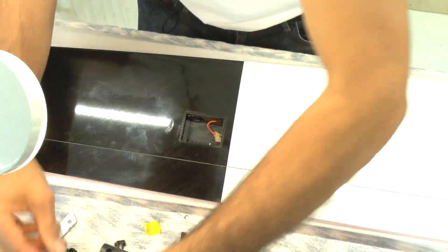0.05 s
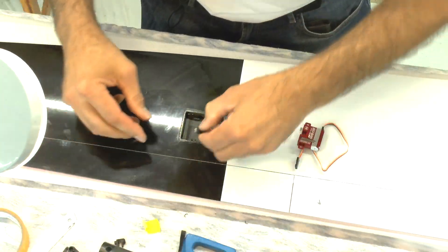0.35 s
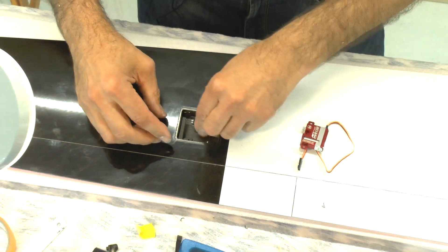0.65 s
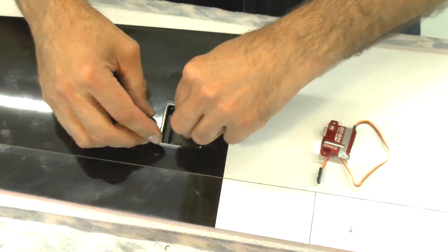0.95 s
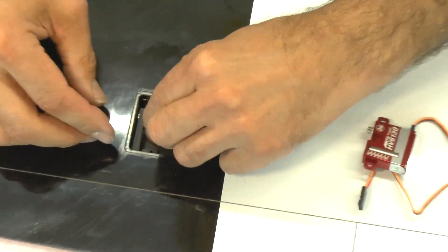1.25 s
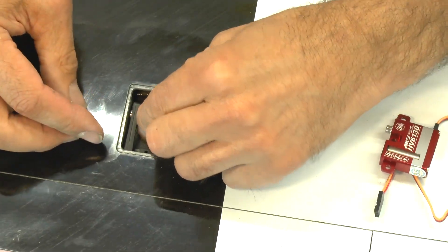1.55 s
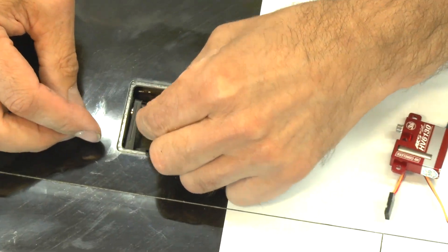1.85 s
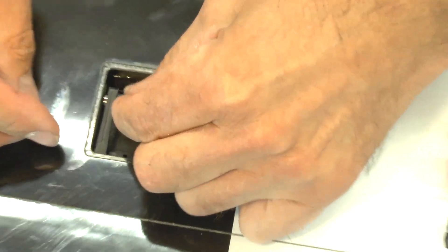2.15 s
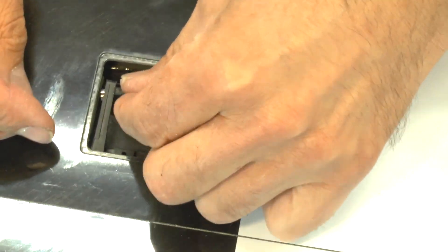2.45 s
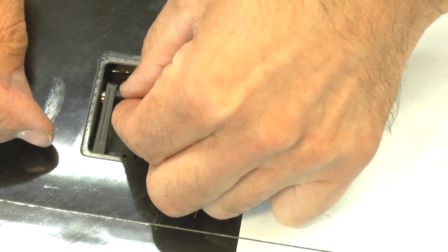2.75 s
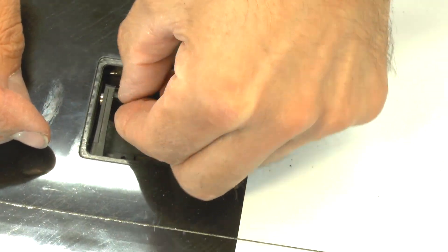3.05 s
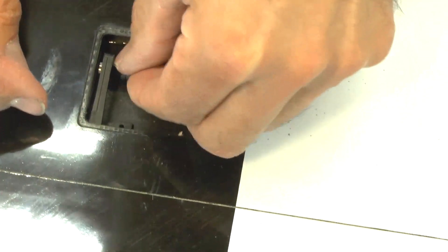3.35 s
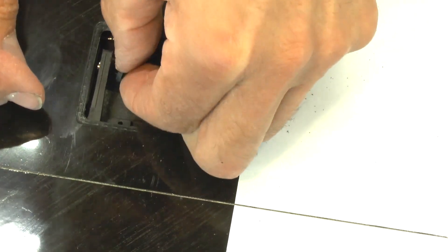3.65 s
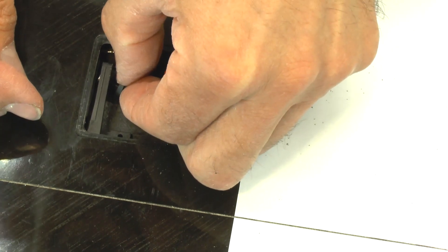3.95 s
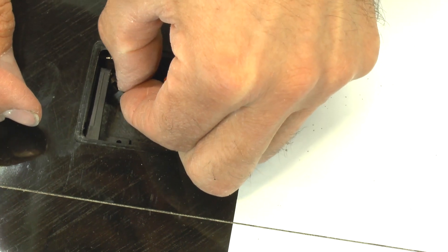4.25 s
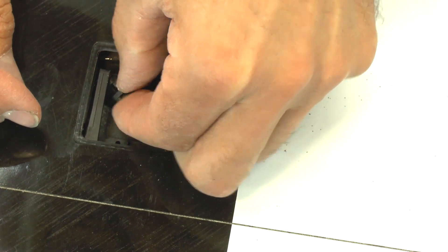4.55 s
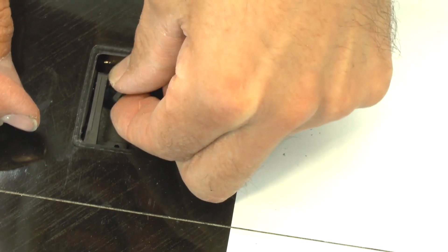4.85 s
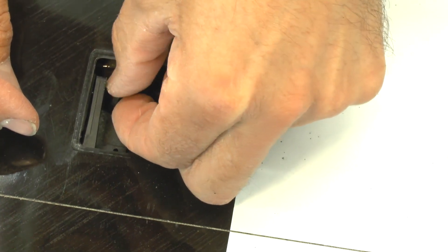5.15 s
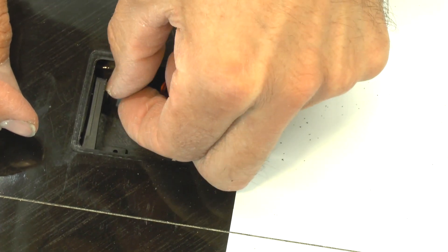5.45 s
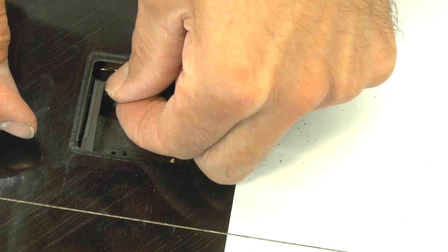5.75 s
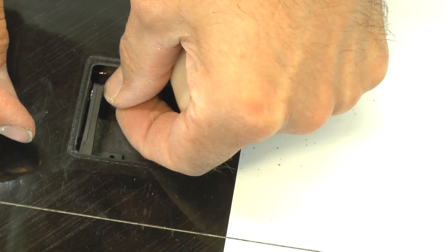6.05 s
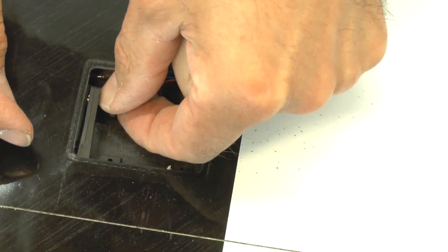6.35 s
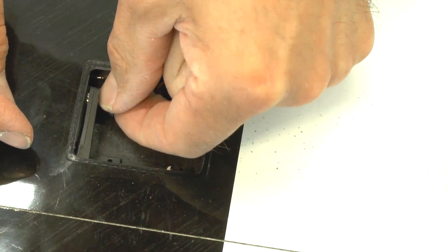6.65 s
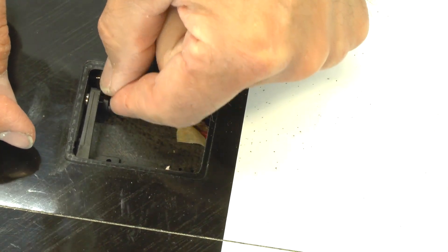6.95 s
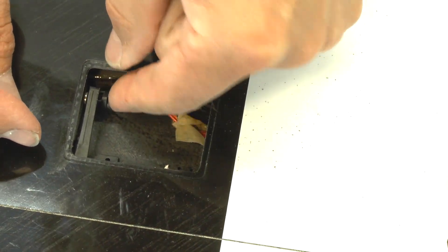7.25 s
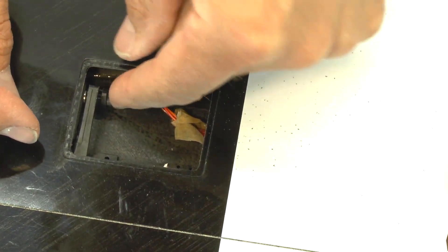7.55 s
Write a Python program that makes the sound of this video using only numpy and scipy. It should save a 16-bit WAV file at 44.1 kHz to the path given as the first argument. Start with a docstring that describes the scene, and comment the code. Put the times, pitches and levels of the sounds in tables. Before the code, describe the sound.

Small metal and plastic parts scrape, click and knock inside a hollow model wing as fingers press them in, ending with a sharp snap.

```python
"""A quiet workshop, a stereo microphone close to the servo bay of a hollow composite model wing.
Over faint hiss and a swelling rumble, fingers rub along the skin. From about 0.8 s small metal and
plastic parts scrape in short strokes and knock into place, setting the shell ringing. Near 3.5 s come
the first dry ticks and a fingertip's thump. At 5.3 s something squeaks further off in the room;
then the close work goes on, ending on a sharp snap."""
import sys
import numpy as np
from scipy import signal
from scipy.fft import rfft, irfft, next_fast_len
from scipy.io import wavfile
from scipy.ndimage import uniform_filter1d

SR = 44100
rng = np.random.default_rng(int(sys.argv[2]) if len(sys.argv) > 2 else 0)


def output_pcm(signal):
    """Save a mono or channel-first signal as 16-bit PCM at the path in sys.argv[1].

    Samples are clipped to [-1, 1] before scaling.
    """
    pcm = np.clip(np.atleast_2d(signal).T, -1, 1) * 32767
    wavfile.write(sys.argv[1], SR, np.round(pcm).astype(np.int16))


N = 343539
RING_SAMPLES = 8192
RING_HZ = np.fft.rfftfreq(RING_SAMPLES, 1 / SR)
SIDES = np.array([[.5], [-.5]])   # splits a left-minus-right value between the channels
BLOW_GAIN_DB = 25   # for knocks and thumps


def from_db(db):
    """Decibels to gain."""
    return 10 ** (np.asarray(db) / 20)


def unit_energy(x):
    """Scale each row so that its squares sum to one."""
    return x / np.sqrt(np.sum(x ** 2, axis=-1, keepdims=True) + 1e-20)


def at_hz(points, hz):
    """Read rows of frequency and value on a log-frequency axis."""
    known_hz, values = np.transpose(points)
    return np.interp(np.log(np.maximum(hz, 1)), np.log(known_hz), values)


def coloured(x, spectrum):
    """Shape noise by rows of frequency in Hz and gain in dB."""
    size = x.shape[-1]
    gain = from_db(at_hz(spectrum, np.fft.rfftfreq(size, 1 / SR)))
    return irfft(rfft(x) * gain, size)


def minimum_phase(gain):
    """The spectrum of the quickest ring that has this gain at each frequency."""
    cepstrum = irfft(np.log(gain + 1e-12))
    cepstrum[1:RING_SAMPLES // 2] *= 2
    cepstrum[RING_SAMPLES // 2 + 1:] = 0
    return np.exp(rfft(cepstrum))


# The workshop at rest. Each row: frequency in Hz, relative level in dB.
ROOM_TONE = [(8.8, -13), (15, 8), (32, 0.5), (150, -12), (364, -16), (444, -17), (642, -19), (854, -20.5),
             (1170, -21.5), (1600, -23), (1890, -24.5), (3070, -27), (3440, -27), (4580, -28), (13500, -29)]
# Its stereo width. Each row: frequency in Hz, side level against mid in dB.
ROOM_TONE_WIDTH = [(25, 3), (45, -3), (70, -2.5), (120, -1), (200, 1.5), (300, 1), (700, -1), (1300, -3),
                   (4400, -2), (8000, -.5), (13000, 0)]


def room_tone(level_db=-56.5, top_hz=13900):
    """Steady noise all around the microphone, heaviest in the bass, under an even hiss."""
    mid, side = coloured(rng.standard_normal((2, next_fast_len(N))), ROOM_TONE)
    stereo = (mid + coloured(side, ROOM_TONE_WIDTH) * [[1], [-1]]) / mid.std()
    lowpass = signal.ellip(10, .1, 70, top_hz, fs=SR, output="sos")
    return from_db(level_db) * signal.sosfilt(lowpass, stereo)[:, :N]


# Swells of bass at the microphone. Each row: time in seconds, deep layer in dB, low layer in dB.
RUMBLE_SWELLS = [(0, -57, -72), (1.45, -60, -70), (1.6, -58, -60), (2.05, -40, -54), (2.15, -44, -56),
                 (2.24, -31, -53), (2.36, -45, -61), (2.55, -45, -63), (2.75, -55, -66), (3.4, -59, -63),
                 (3.8, -68, -76), (4.8, -70, -72), (5.0, -58, -60), (5.7, -58, -54.5), (6.2, -62, -64),
                 (6.62, -55, -66), (6.77, -43, -53), (7.2, -55, -66), (7.79, -54, -66)]
# The colour of each layer. Each row: frequency in Hz, relative level in dB.
DEEP_SPECTRUM = [(8, -14), (16, 2), (30, -3), (55, -15), (100, -30), (300, -54)]
LOW_SPECTRUM = [(20, -8), (60, 2), (120, -4), (200, -2.5), (350, -9), (600, -17), (1500, -40)]


def rumble():
    """Two swelling layers of bass noise, with opposite sign left and right."""
    times, *levels_db = np.transpose(RUMBLE_SWELLS)
    out = np.zeros(N)
    for spectrum, level_db in zip((DEEP_SPECTRUM, LOW_SPECTRUM), levels_db):
        noise = coloured(rng.standard_normal(next_fast_len(N)), spectrum)[:N]
        swell = from_db(np.interp(np.arange(N) / SR, times, level_db))
        out += noise / noise.std() * swell
    return signal.sosfilt(signal.butter(2, 1500, fs=SR, output="sos"), out) * [[1], [-1]]


# Resonances of the shell and its parts. Each row: frequency in Hz, width in Hz, relative level in dB.
WING_MODES = [(372, 117, -11), (537, 114, -11), (598, 120, -6.5), (1044, 310, -2), (1090, 150, -11.5),
              (1288, 110, -7), (1544, 120, -6.5), (1730, 205, -2), (1915, 88, -6.5), (2193, 110, -7),
              (2480, 350, -7), (3130, 280, -12), (3900, 630, -7), (4550, 270, -10), (5230, 890, -4.5),
              (6720, 1540, 0.5), (7180, 270, -7), (7670, 910, -3.5), (11300, 1200, -11)]
# Where the ring sits at the microphone. Each row: frequency in Hz, left over right in dB.
WING_BALANCE = [(200, 2), (400, 4.5), (680, 4.5), (1200, -0.5), (1850, 2), (2500, -6), (4400, -2),
                (7200, -1), (9000, 5.5)]
# How it reaches the two sides. Each row: frequency in Hz, phase lead of the left in radians.
WING_PHASE_LEAD = [(600, 0.64), (1300, -1), (1800, -0.7), (2200, -1.47), (3600, -1.1), (6700, -0.04),
                   (8200, 0.87), (10000, -2)]


def wing_ring(contact_db, spread_s, skirt=1.094):
    """The hollow wing ringing close up; each point of contact colours it differently."""
    hz, width, db = np.transpose(WING_MODES)[:, :, None]
    off_centre = (RING_HZ ** 2 - hz ** 2) / ((RING_HZ + 1) * width)
    peaks = from_db(db) * unit_energy((1 + off_centre ** 2) ** (-skirt / 2))
    gain = np.sqrt(np.sum(peaks ** 2, axis=0) * len(RING_HZ)) * from_db(contact_db)
    # bending waves disperse: each frequency reaches the air after its own short delay
    delays = spread_s * rng.uniform(0, 2.4, size=48)
    delay = np.interp(RING_HZ, np.linspace(0, SR / 2, len(delays)), delays)
    phase = SIDES * at_hz(WING_PHASE_LEAD, RING_HZ) - 2 * np.pi * np.cumsum(delay) * RING_HZ[1]
    balance = from_db(SIDES * at_hz(WING_BALANCE, RING_HZ))
    ring = irfft(minimum_phase(gain) * balance * np.exp(1j * phase))
    return ring[:, :RING_SAMPLES // 2]


def friction(strokes, catches_per_s=5000, spread_db=2.5, falter_db=1.5, gain_db=-0.5):
    """Tiny catches of the surface drive the wing while the pressure rises, falters and falls."""
    out, t = np.zeros((2, N)), np.arange(N) / SR
    catches = (rng.random(N) < catches_per_s / SR) * rng.choice([-1, 1], N)
    falter = uniform_filter1d(rng.standard_normal(N), size=300)
    strength_db = spread_db * np.minimum(rng.exponential(1, N), 3)
    catches = catches * from_db(strength_db + falter_db * falter / falter.std())
    catches /= catches.std()
    for peak, rise, fall, contact_db in strokes:
        start, end = peak - max(rise, .004), peak + max(fall, .004)
        span = slice(max(int(start * SR), 0), int(end * SR))
        pressure = np.interp(t[span], [start, peak, end], [0, 1, 0]) ** 0.98
        ring = wing_ring(contact_db, spread_s=0.000525)
        add(out, start, signal.fftconvolve(ring, (catches[span] * pressure)[None], axes=1))
    return from_db(gain_db) * out


def add(track, s, sound):
    """Mix a sound into a stereo track at s seconds."""
    start = max(int(s * SR), 0)
    part = sound[..., :max(N - start, 0)]
    track[:, start:start + part.shape[-1]] += part


# Fingers on the skin, close by. Each row: peak time, rise and fall in seconds, relative level in dB.
RUB_STROKES = [(0.09, 0.035, 0.013, -63.5), (0.37, 0.086, .046, -65.5), (0.68, 0.17, 0.11, -63),
               (1.28, 0.11, 0.23, -64), (1.63, 0.13, 0.042, -65.5), (2.4, 0.12, 0.082, -69),
               (4.64, 0.33, 0.2, -65.5), (5.75, 0.17, .11, -68.5)]
# The force of a rub. Each row: frequency in Hz, relative level in dB.
RUB_SPECTRUM = [(300, -1.5), (900, -1.5), (1400, -1.5), (1850, -0.5), (2900, -3.5), (5200, -2),
                (6400, -1.5), (7700, -1), (10000, -1.5), (15000, -17)]


def rubs(shift_count=30, shift_s=0.053, shift_db=-69.5, spread_db=7):
    """Fingers rub along the skin, and the tips shift lightly at random moments."""
    shifts = [(when * N / SR, shift_s * lean, shift_s * (1 - lean), shift_db + spread_db * (2 * push - 1))
              for when, lean, push in rng.random((shift_count, 3))]
    colour_db = at_hz(RUB_SPECTRUM, RING_HZ)
    return friction([(s, rise, fall, db + colour_db) for s, rise, fall, db in RUB_STROKES + shifts])


def contact(force, brightness, spot_hz, spot_db, spot_octaves=0.68):
    """Colour of a contact in dB: harder surfaces tilt it to the treble; each spot favours one pitch."""
    tilt = brightness * np.log2(np.clip(RING_HZ, 480, 7200) / 1800)
    octaves_off = np.log2((RING_HZ + 1) / spot_hz)
    boost = spot_db * np.exp(-.5 * (octaves_off / spot_octaves) ** 2)
    return at_hz(force, RING_HZ) + tilt + boost


# Parts sliding just in front of the microphone. Each row: peak time, rise and fall in seconds,
# relative level in dB, brightness in dB per octave, pitch the spot favours in Hz.
SCRAPE_STROKES = [(0.835, .059, 0.028, -60, 0.5, 1000), (1.07, 0.027, 0.059, -68, 2, 900),
                  (1.19, 0.077, 0.016, -67, 1.5, 1000), (1.745, 0.03, 0.072, -57, -1, 2200),
                  (1.822, 0.022, 0.013, -61.5, -4.5, 800), (2.065, 0.027, 0.028, -51.5, 1, 7000),
                  (2.102, .021, 0.024, -55, -2, 2200), (2.163, 0.0088, 0.0083, -61.5, 1, 7000),
                  (2.224, 0.03, 0.013, -48, 4, 7600), (2.233, 0.013, 0.033, -47, -0.5, 3120),
                  (2.37, 0.081, 0.17, -64, 0, 2190), (2.745, 0.011, .014, -52.5, 1, 1000),
                  (3.265, 0.032, 0.025, -57, -0.5, 2210), (3.322, .022, .016, -60, -1, 2000),
                  (3.42, 0.045, 0.03, -57.5, 0, 1810), (3.478, 0.03, 0.026, -63.5, -2.5, 990),
                  (3.765, 0.066, 0.028, -57.5, -2, 1700), (3.955, .11, 0.064, -61.5, 0.5, 2200),
                  (4.015, .05, .032, -55, 1, 2400), (4.11, 0.025, 0.027, -66, 0, 2000),
                  (4.35, 0.065, 0.12, -62.5, -1, 1500), (4.963, 0.024, 0.017, -53, -1.5, 2500),
                  (5.01, 0.033, 0.073, -66.5, -2.5, 900), (5.454, 0.015, 0.016, -46, 0, 830),
                  (5.71, 0.066, 0.03, -64, -2, 800), (6.416, 0.041, 0.091, -55, -1.5, 1090),
                  (6.542, 0.069, 0.016, -52, -0.5, 1985), (7.443, 0.015, 0.059, -64, -0.5, 1000),
                  (7.52, 0.12, 0.061, -63.5, 3.5, 980)]
# The force of a scrape. Each row: frequency in Hz, relative level in dB.
SCRAPE_SPECTRUM = [(300, 0.5), (950, 1.5), (1500, -2), (2400, 1), (3100, -5.5), (4500, -7.5), (7300, -5),
                   (12000, -11), (15000, -21)]


def scrapes():
    """Metal and plastic parts drag over the shell in short strokes."""
    return friction([(s, rise, fall, db + contact(SCRAPE_SPECTRUM, brightness, spot_hz, spot_db=5))
                     for s, rise, fall, db, brightness, spot_hz in SCRAPE_STROKES])


# Parts striking the bay, close up. Each row: time in seconds, relative level in dB, brightness in dB
# per octave, pitch the spot favours in Hz, looseness of the part (1 is usual).
BAY_KNOCKS = [(0.853, -38.5, 4, 780, 0.83), (1.1761, -61.5, -1.5, 1740, 1.1), (1.732, -71, -5, 1500, 3),
              (1.992, -59, -4.5, 7200, 1), (2.071, -59, -4, 1870, 2), (2.091, -49, -2, 2600, 1.1),
              (2.131, -60, -2, 700, 2.3), (2.7232, -52, 1.5, 1180, 1.8), (2.7553, -41, .3, 2210, 1.04),
              (3.314, -60, -4.5, 1420, 1.5), (3.5621, -39.5, -3.5, 1370, 1.87), (4.483, -64.5, -3, 1200, 2),
              (4.7286, -45, -3.5, 2150, 1.04), (4.899, -54, -4.5, 1980, 1.3), (4.9717, -56.5, -6, 1310, 2),
              (6.4092, -59.5, -3, 1830, 1.3), (6.5719, -62.5, -7, 990, 3.1), (6.7201, -63, -7, 397, 1.1),
              (6.7499, -63, -1.5, 600, 1.3), (6.755, -56.5, -1, 700, 0.82), (6.7598, -53, -2, 1000, 1),
              (7.408, -68, 0, 900, 2.4), (7.427, -54, 0, 1050, 3.4), (7.5144, -59.5, -4.5, 1400, 3.4),
              (7.7614, -34.5, -0.3, 950, 0.53)]
# The force of a knock. Each row: frequency in Hz, relative level in dB.
KNOCK_SPECTRUM = [(200, -0.5), (500, 1), (1100, -2.5), (2000, -1), (4000, -0.5), (7500, -0.5),
                  (13000, -14.5)]


def knocks(slip_s=.01, slip_rise_s=0.0012, chatter_s=0.0024):
    """The part slips for an instant, strikes home, and chatters briefly as it seats."""
    out, t = np.zeros((2, N)), np.arange(RING_SAMPLES) / SR - slip_s
    slip = 0.57 * unit_energy((t < 0) * np.exp(-np.abs(t) / slip_rise_s))
    chatter = 0.37 * unit_energy((t > 0) * np.exp(-np.abs(t) / chatter_s))
    for s, db, brightness, spot_hz, looseness in BAY_KNOCKS:
        force = looseness * (slip + chatter) * rng.standard_normal(len(t))
        force[int(slip_s * SR)] += 1   # the strike itself
        contact_db = db + contact(KNOCK_SPECTRUM, brightness, spot_hz, spot_db=10.5)
        ring = wing_ring(contact_db, spread_s=0.000729)
        add(out, s - slip_s, signal.fftconvolve(ring, unit_energy(force)[None], axes=1))
    return from_db(BLOW_GAIN_DB) * out


# Tiny dry ticks, close and centred. Each row: start in seconds, pitch in Hz, level in dB,
# time to the peak in seconds.
DRY_TICKS = [(3.5316, 4300, -27.5, 0.000048), (3.5385, 3700, -42, 0.000081), (6.664, 3050, -51.5, 0.00054),
             (7.247, 3050, -44.5, .0005)]


def ticks():
    """Each tick swells and dies within a few cycles."""
    out, t = np.zeros((2, N)), np.arange(RING_SAMPLES) / SR
    for s, hz, db, peak_s in DRY_TICKS:
        envelope = t / peak_s * np.exp(1 - t / peak_s)
        add(out, s, from_db(db) * envelope * np.sin(2 * np.pi * hz * t))
    return out


# The skin bending as a whole. Each row: frequency in Hz, relative level in dB,
# seconds to fall 60 dB, left over right in dB.
SKIN_MODES = [(195, -13, .02, 5), (262, -9, .055, 4), (372, -3, .055, 2)]
# A fingertip landing near the microphone. Each row: start in seconds, relative level in dB.
FINGER_THUMPS = [(3.5639, -48.5), (4.8981, -48.5), (6.721, -54), (6.7488, -43), (6.7534, -47),
                 (6.7601, -41), (7.7624, -54.5)]


def thumps(softness_hz=700):
    """Flesh gives a slow push that only bends the skin."""
    out, t = np.zeros((2, N)), np.arange(RING_SAMPLES) / SR
    ring = np.zeros((2, RING_SAMPLES))
    for hz, db, t60, pan_db in SKIN_MODES:
        mode = np.cos(2 * np.pi * hz * t) * from_db(-60 * t / t60)
        ring += from_db(db + SIDES * pan_db) * unit_energy(mode)
    thump = signal.sosfilt(signal.butter(2, softness_hz, fs=SR, output="sos"), ring)
    for s, db in FINGER_THUMPS:
        add(out, s, from_db(db + BLOW_GAIN_DB) * thump)
    return out


# A climbing squeak further off, to the right of the microphone. Each row: start and length in seconds,
# pitch in Hz, relative level in dB.
SQUEAK_NOTES = [(5.316, 0.029, 1550, -60.5), (5.33, 0.052, 2290, -54.5), (5.377, 0.029, 3180, -49),
                (5.383, 0.028, 2020, -53), (5.395, 0.0086, 4120, -52.5), (5.439, .04, 3450, -59)]


def far_squeak(waver=0.078, sag=0.046, pan_db=-5.0):
    """Stick-slip locks briefly on one pitch after another, unsteady and sagging."""
    out = np.zeros((2, N))
    for s, length, hz, db in SQUEAK_NOTES + rasp():
        progress = np.linspace(0, 1, int(length * SR))
        jitter = uniform_filter1d(rng.standard_normal(RING_SAMPLES), size=40)
        jitter = np.resize(jitter / jitter.std(), len(progress))
        pitch = hz * (1 + waver * jitter - sag * (progress - .5))
        envelope = 2 * np.sqrt(np.abs(np.sin(np.pi * progress)))
        add(out, s, from_db(db) * envelope * np.sin(2 * np.pi * np.cumsum(pitch) / SR))
    return out * from_db(SIDES * pan_db)


def rasp(count=16, start_s=5.385, span_s=0.05, slip_s=.012, low_hz=1490, high_hz=4790):
    """The squeak breaks up into more notes: short slips in random order, weaker the higher they are."""
    moments, scatter = rng.random((count, 2)).T
    heights = (np.arange(count) + scatter) / count
    pitches = low_hz * (high_hz / low_hz) ** heights
    levels_db = -52.5 - 10 * heights ** 2
    return [(start_s + span_s * when, slip_s, hz, db) for when, hz, db in zip(moments, pitches, levels_db)]


# Echoes off the nearby bench and tools, then the room. Each row: frequency in Hz, gain in dB.
BENCH_ECHO = [(150, 9), (500, -9), (1200, -10), (2200, -8), (4500, -8.5), (7500, -12), (14000, -9)]
ROOM_ECHO = [(150, -14), (500, -10), (1200, -13), (2200, -13), (4000, -11.5), (7500, -19), (14000, -26)]


def reflections(x, spectrum, t60, first_s, shared):
    """Dense echoes that build up after a short flight and die away, partly alike on both sides."""
    t = np.arange(SR * 2 // 3) / SR
    noise = rng.standard_normal((3, len(t)))
    echoes = coloured(np.sqrt(1 - shared) * noise[:2] + np.sqrt(shared) * noise[2], spectrum)
    envelope = np.clip(t / first_s - 1, 0, 1) * from_db(-60 * t / t60)
    return signal.fftconvolve(x, echoes * unit_energy(envelope), axes=1)[:, :N]


def scene(squeak_direct_db=-4.5, squeak_room_db=11.5):
    """The handling is close and dry; the squeak reaches the microphone mostly through the room."""
    hands = knocks() + rubs() + scrapes() + ticks() + thumps()
    squeak = far_squeak()
    bench = reflections(hands, BENCH_ECHO, t60=0.059, first_s=0.0026, shared=0.27)
    into_room = hands + from_db(squeak_room_db) * squeak
    room = reflections(into_room, ROOM_ECHO, t60=0.36, first_s=0.0067, shared=0.58)
    return hands + from_db(squeak_direct_db) * squeak + bench + room + room_tone() + rumble()


def record(dry, cutoff_hz=16400):
    """The top of the microphone's signal is cut steeply."""
    return signal.sosfilt(signal.ellip(10, .1, 80, cutoff_hz, fs=SR, output="sos"), dry)


dry = scene()
out = record(dry)
output_pcm(out)
```